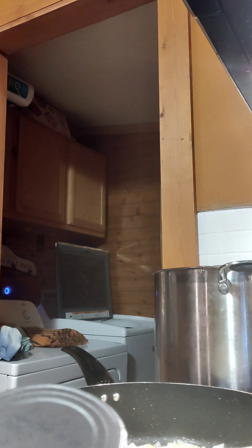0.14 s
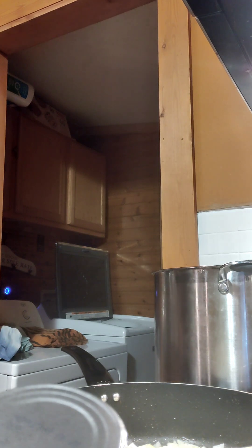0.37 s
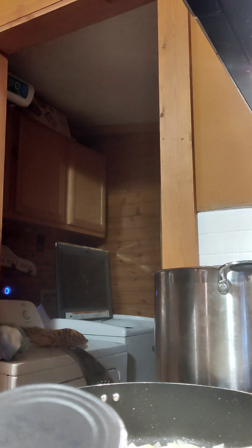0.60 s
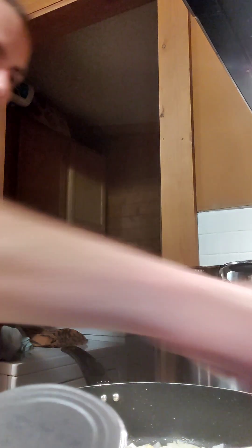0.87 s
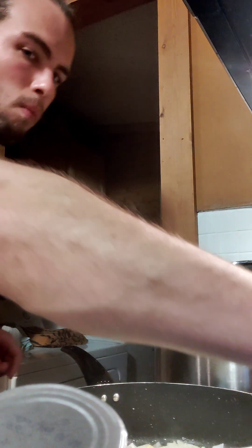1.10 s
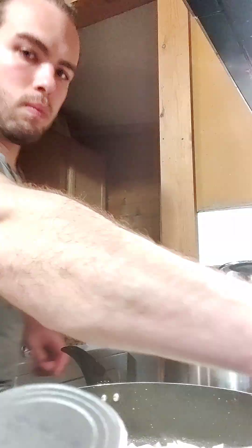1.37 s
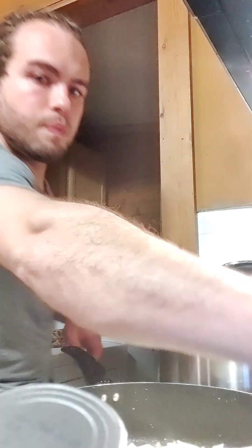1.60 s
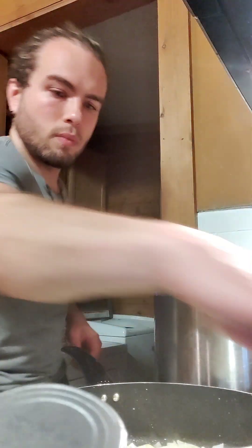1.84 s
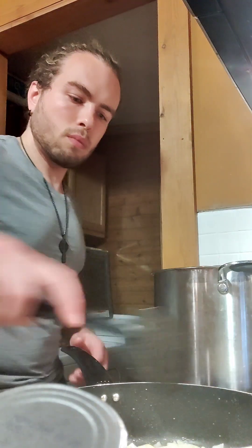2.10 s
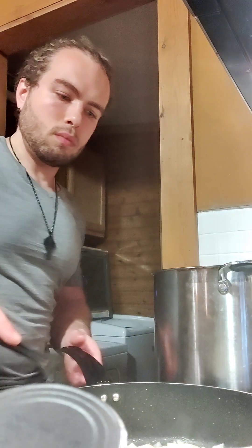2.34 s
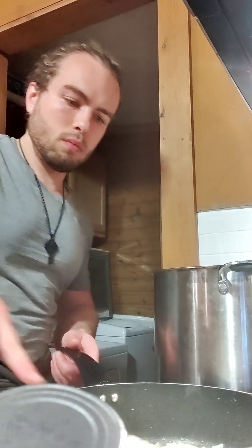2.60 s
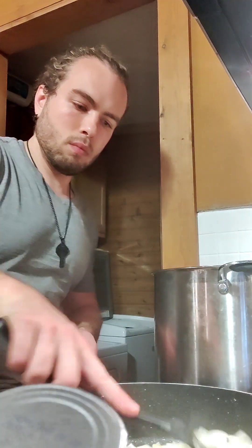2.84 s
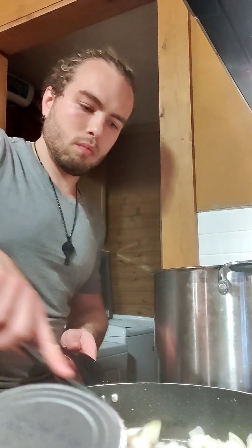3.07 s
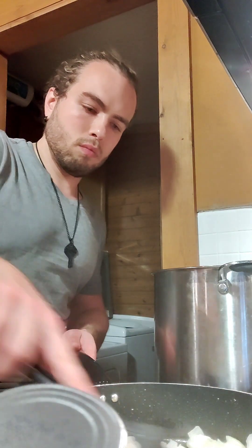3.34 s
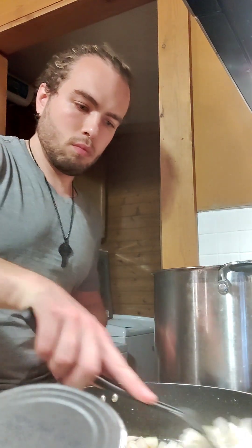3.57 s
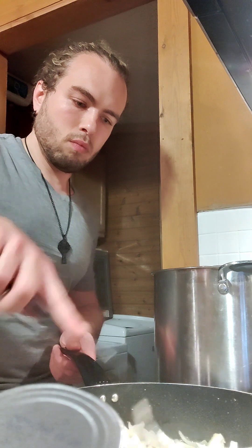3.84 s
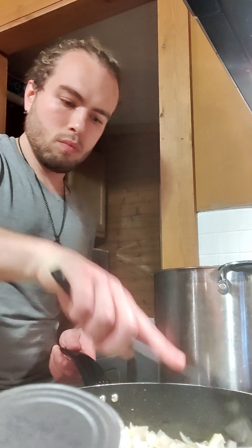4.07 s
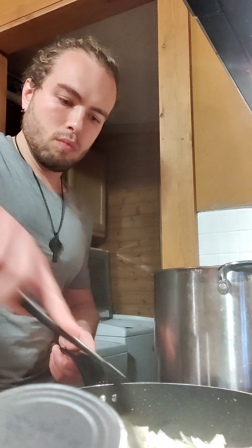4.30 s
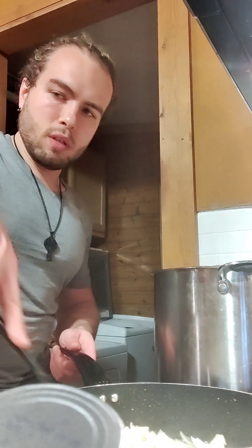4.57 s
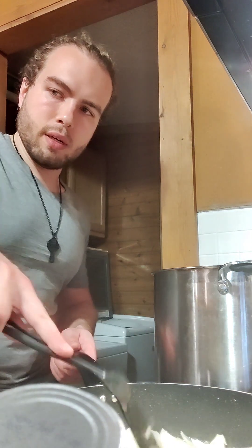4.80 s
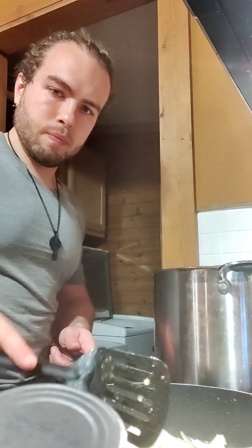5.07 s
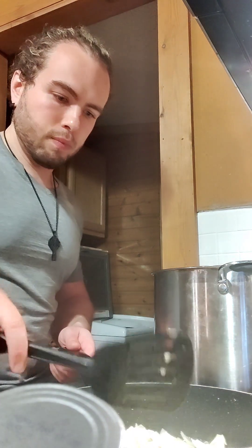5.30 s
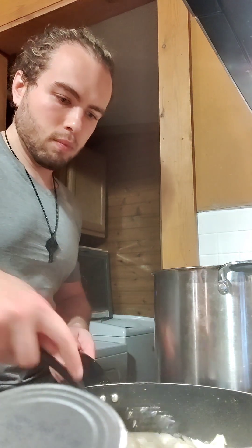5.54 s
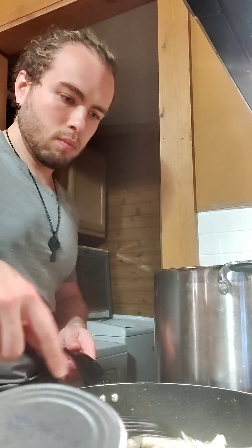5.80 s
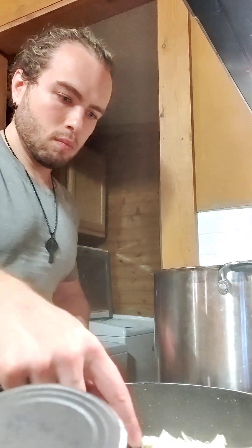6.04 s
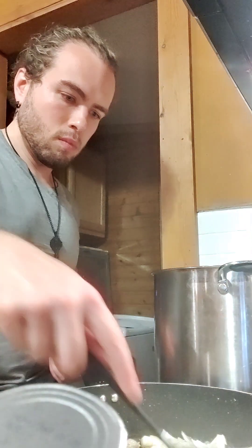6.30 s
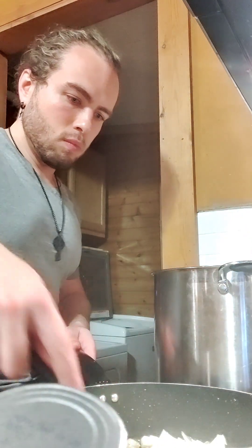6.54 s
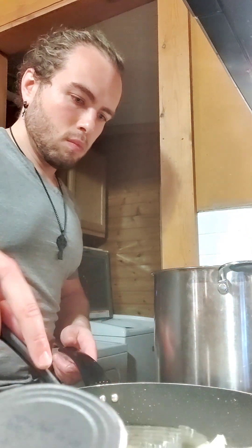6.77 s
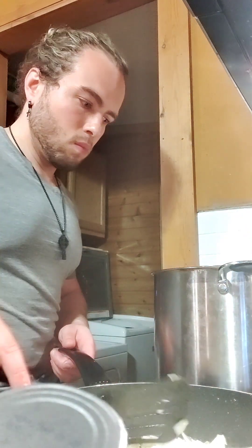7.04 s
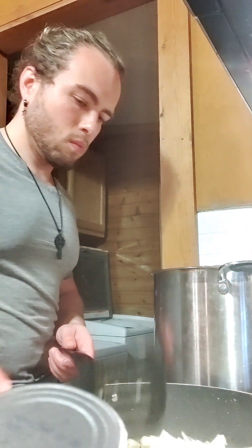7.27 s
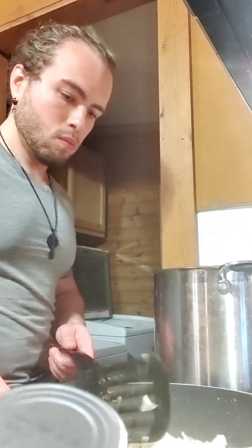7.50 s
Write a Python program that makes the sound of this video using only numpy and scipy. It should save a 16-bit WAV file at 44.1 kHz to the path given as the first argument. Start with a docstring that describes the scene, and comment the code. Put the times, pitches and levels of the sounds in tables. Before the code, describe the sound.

Chopped onions sizzle softly in a pan; a spatula clatters as it is picked up, stirs quietly, then knocks the rim three times loudly.

```python
"""Chopped onions fry gently in a pan close to a mono microphone in a small kitchen.
The frying is dense random bubble clicks, coloured and levelled in bands; bursts and spits of fat stand out.
A spatula is picked up with a clatter of damped tones, touches the pan while stirring and drags over its
floor, then is knocked out on the rim three times: each blow rings a bank of pan modes.
The pan's low resonances simmer as filtered noise, and an appliance hums behind as wavering sines."""
import sys
import numpy as np
from scipy import signal
from scipy.fft import rfft, irfft
from scipy.io import wavfile

SR = 44100
rng = np.random.default_rng(int(sys.argv[2]) if len(sys.argv) > 2 else 0)


def magnitude_from_level(level_db):
    """Linear magnitude for a level in decibels (20 dB per decade)."""
    exponent = np.asarray(level_db, float) / 20
    return 10 ** exponent


def materialize(psi):
    """Save the field psi as 16-bit PCM at rate SR to the path in sys.argv[1].

    A 1-D psi becomes a single channel; in a 2-D psi each row is a channel.
    """
    bounded = np.clip(np.atleast_2d(psi).T, -1, 1)
    quanta = np.round(bounded * 32767).astype(np.int16)
    wavfile.write(sys.argv[1], SR, quanta)


N = 337082
TIME = np.arange(N) / SR
CALM_FIZZ_DB = -52.5   # fizz at rest, before its surges and flicker


def rms_one(x):
    """Scale to rms 1."""
    return x / np.sqrt(np.mean(x ** 2) + 1e-20)


def filtered(x, order, hz, kind):
    """Butterworth filter: low, high or band."""
    return signal.sosfilt(signal.butter(order, hz, kind, fs=SR, output="sos"), x)


def drift(rate_hz):
    """Slow chance of spread 1: coarse noise, one value per 40 samples, twice through a one-pole low-pass."""
    r = np.exp(-2 * np.pi * rate_hz * 40 / SR)
    noise = rng.standard_normal(N // 40 + 2002)
    slow = signal.lfilter([1], [1, -2 * r, r * r], noise)[2000:]   # leave out the run-in
    return np.interp(np.arange(N) / 40, np.arange(len(slow)), rms_one(slow))


def ring(clicks, hz, t60):
    """A resonator: a unit click sets a damped sine of height about 1 ringing."""
    r, w = magnitude_from_level(-60 / (t60 * SR)), 2 * np.pi * hz / SR
    return signal.lfilter([0, np.sin(w)], [1, -2 * r * np.cos(w), r * r], clicks + 1e-18)


def resonance(noise, hz, width_hz):
    """A damped resonance kept going by noise, its decay time set by its width, rms 1."""
    return rms_one(ring(noise, hz, np.log(1000) / (np.pi * width_hz)))


def add(out, s, sound):
    """Mix a short sound in at s seconds."""
    i = round(s * SR)
    out[i:i + len(sound)] += sound[:max(N - i, 0)]


def grains(per_s, spread_db):
    """Random clicks, most small and a few large, rms 1."""
    sizes = magnitude_from_level(spread_db * np.minimum(rng.exponential(1, N), 5)) * rng.choice([-1, 1], N)
    return rms_one(sizes * (rng.random(N) < per_s / SR))


def liveliness():
    """Lift of the frying in dB: each stir or jolt turns fresh onion into the fat; quick rise, then fading."""
    # stirs and jolts of the pan: (t/s, lift/dB, fade/s)
    stirs = [(-.05, 7.5, 0.095), (.30, 5, 0.21), (1.39, 5.5, 0.52), (2.55, 5, 0.96), (3.08, 4.5, 0.17),
             (3.49, 4.5, 0.42), (3.72, 4.5, 0.39), (4.071, 1, 0.68), (4.28, 1, 0.96), (4.782, 5, 0.37),
             (5.699, 2.5, 0.077), (6.21, 1, 0.17), (6.51, 7.5, 0.12), (6.78, 7, 0.042), (7.33, 6, 0.41),
             (7.48, 5, 0.25)]
    attack_s = 0.027
    coarse = TIME[::64]
    lift_db = np.zeros(len(coarse))
    for s, db, fade in stirs:
        t = np.maximum(coarse - s, 0)
        lift_db += db * (1 - np.exp(-t / attack_s)) * np.exp(-t / fade)
    return np.interp(TIME, coarse, lift_db)


def sizzle(per_s, spread_db, smooth, surge_db, neighbour_db, own_db):
    """Dense bubble collapses heard in third-octave bands; they come in surges, and the bands flicker."""
    # colour of fizz and murmur: (f/Hz, relative density/dB per Hz)
    fizz_colour = [(190, -45), (330, 0), (371, 5), (482, -4.5), (542, 4.5), (594, -1), (803, 3.5),
                   (903, 1.5), (1020, 6), (1300, 0), (1600, 6), (2440, 3.5), (3510, 4.5), (6500, 6.5),
                   (7500, 5), (9750, -31), (16500, -120)]
    # colour of the top treble of the sizzle: (f/Hz, relative density/dB per Hz)
    treble_colour = [(7900, -4.5), (8300, -1), (9500, -1), (11000, -6.5), (12500, -9.5), (14000, -10.5),
                     (15100, 2.5), (15600, -14)]
    lift_db = liveliness()
    fizz_db = CALM_FIZZ_DB + lift_db
    murmur_db = -53 + 0.7 * lift_db
    treble_db = -50 + 0.67 * lift_db + 0.5 * TIME   # the top treble rises slowly throughout
    surge = surge_db * (drift(12) + drift(40))
    regions = [neighbour_db * drift(25) for _ in range(4)]   # neighbouring bands flicker together

    # clicks over smooth noise, twice, so that adjacent bands differ
    crackle = [grains(per_s, spread_db) + smooth * rng.standard_normal(N) for _ in range(2)]
    colour_hz, colour_db = np.transpose(fizz_colour[:-2] + treble_colour)
    hz = np.fft.rfftfreq(N, 1 / SR) + 1
    colour = magnitude_from_level(np.interp(np.log(hz), np.log(colour_hz), colour_db))
    in_fizz = (hz > 4500) * (hz < 7800)   # this range sets the reference level
    fizz_share = np.sqrt(np.mean(colour ** 2 * in_fizz) * (1 + smooth ** 2))
    crackle = irfft(rfft(np.array(crackle)) * colour / fizz_share, N)

    edges = 250 * 2 ** (np.arange(20) / 3)
    out = np.zeros(N)
    for k, (low, high) in enumerate(zip(edges, edges[1:])):
        band = filtered(crackle[k % 2], 2, [low, high], "band")
        level_db = murmur_db if high < 2600 else treble_db if low > 7900 else fizz_db
        level_db = level_db + surge + regions[k // 5]
        if low < 11000:
            level_db = level_db + own_db * drift(21)   # each band's own flicker
        out += band * magnitude_from_level(level_db)
    return out


def simmer():
    """Low pan and stove resonances kept going by the simmer: noise twice through each, wavering."""
    # resonances: (f/Hz, width of each pass/Hz, rms level/dB)
    low_modes = [(145.2, 20, -64), (215.8, 25.6, -57.5), (293.6, 89, -67), (76, 80, -76.5)]
    lift_db = liveliness()
    follow_db = 0.4 * (lift_db - lift_db.mean())
    out = np.zeros(N)
    for hz, width_hz, level_db in low_modes:
        once = resonance(rng.standard_normal(N), hz, width_hz)
        twice = resonance(once, hz, width_hz)
        out += magnitude_from_level(level_db + follow_db + 0.23 * drift(5.2)) * twice
    return out


def hum():
    """Appliance motor tones: sines that waver slowly in level and phase."""
    # tones: (f/Hz, rms level/dB)
    tones = [(75.4, -70), (142, -74), (204.6, -72.5), (301.5, -69.5), (376.8, -79.5)]
    out = np.zeros(N)
    for hz, level_db in tones:
        height = np.sqrt(2) * magnitude_from_level(level_db + 1.0 * drift(0.56))
        out += height * np.sin(2 * np.pi * hz * TIME + 0.2 * drift(0.52))
    return out


def spits():
    """Short broad bursts of spitting fat, at random, following the fizz."""
    per_s, level_db, t60_s = 70, 2, 0.031   # level of the smallest, relative to the fizz
    sizes = (rng.random(N) < per_s / SR) * magnitude_from_level(1.3 * np.minimum(rng.exponential(1, N), 3))
    fall = signal.lfilter([1], [1, -magnitude_from_level(-60 / (t60_s * SR))], sizes + 1e-18)
    hiss = filtered(rng.standard_normal(N), 4, [1500, 8000], "band")
    return magnitude_from_level(CALM_FIZZ_DB + liveliness() + level_db) * fall * hiss


def bubble(hz, cycles, rise, swell):
    """A bursting bubble: a sine swells for a few cycles and climbs in pitch as it dies; its envelope too."""
    t = np.arange(int(2 + cycles / hz * SR)) / SR * hz   # time in cycles
    fall = magnitude_from_level(-60 * t / cycles) * (1 - np.exp(-t / swell))
    fall = fall / fall.max()
    return np.sin(2 * np.pi * t * (1 + rise * t / cycles)) * fall, fall


def pops(small_per_s, small_db, small_cycles):
    """Large bursts ring, sputter and splash fat; many smaller ones come at random and follow the fizz."""
    # single large bubbles bursting: (t/s, ring level/dB, f/Hz, broad splash re ring/dB)
    bursts = [(0.0732, -52, 3600, 5), (0.104, -48, 6200, 5.5), (0.7087, -48.5, 6570, 3),
              (0.905, -41, 4900, -10), (0.9836, -49, 5470, 2.5), (2.34, -43, 8900, -10),
              (2.684, -51, 6700, -6), (2.91, -40.5, 3240, -6), (3.309, -36, 6570, -7),
              (3.4015, -36, 6030, -14), (3.4857, -32, 5500, -12), (3.625, -33, 4330, -9),
              (3.659, -37, 5420, -12), (3.673, -36.5, 6200, -13), (3.718, -33.5, 4090, -10),
              (3.793, -48, 6050, -7), (3.86, -40, 4800, -6), (3.988, -33, 6660, -11.5),
              (4.042, -53, 6900, -4), (4.315, -41, 5550, -11), (4.344, -43, 4960, -4),
              (4.4667, -38.5, 5220, -12), (4.6353, -32, 4770, -15), (5.1452, -39, 6520, -20),
              (5.3012, -41.5, 7350, -8), (5.5947, -63.5, 6100, -10), (5.805, -46, 3930, -10),
              (5.976, -52, 5740, -10), (6.012, -56, 6240, 8), (6.0302, -38.5, 5880, -14),
              (6.062, -43, 6030, -12), (6.208, -48, 4050, -9), (6.578, -40, 5800, -22),
              (7.062, -45, 4920, 1.5)]
    out = np.zeros(N)
    for s, peak_db, hz, splash_db in bursts:
        noise = rng.standard_normal(6000)
        tone, fall = bubble(hz, cycles=120, rise=0.029, swell=19.0)
        sputter = rms_one(filtered(noise[::-1], 2, 302, "low"))[-len(fall):]
        tone = tone * (0.5 + sputter)
        splash = fall * rms_one(filtered(noise, 2, [2500, 8000], "band"))[:len(fall)]
        add(out, s - .001, magnitude_from_level(peak_db) * (tone + magnitude_from_level(splash_db) * splash))
    fizz_db = CALM_FIZZ_DB + liveliness()
    for when, pitch, size, keep in rng.random((2500, 4)):
        if keep < small_per_s * N / SR / 2500:   # thin the candidates to the wanted rate
            level_db = fizz_db[int(when * N)] + small_db - 5.3 * np.log(size + 0.02)
            tone, _ = bubble(3200 * 2.5 ** pitch, small_cycles, rise=.1, swell=3.0)
            add(out, when * N / SR, magnitude_from_level(level_db) * tone)
    return out


def clatter():
    """Each contact rings a close, beating pair of modes over a short broad rattle."""
    # clicks of the spatula and of things beside the stove: (t/s, level/dB, f/Hz, t60/s, rattle re ring/dB)
    contacts = [(.281, -24.5, 3450, 0.014, -27), (.290, -49, 3620, 0.045, -14),
                (.293, -24, 2053, 0.086, -8.5), (0.296, -29.5, 6230, 0.048, -8),
                (.2975, -19.5, 2323, 0.07, -19), (0.3017, -6.5, 2270, 0.014, -13),
                (0.3085, -21, 2310, .03, -18), (.3155, -27.5, 2313, 0.086, -11.5),
                (.341, -49, 4550, 0.025, -2), (0.474, -37, 2780, 0.086, -4.5), (1.078, -50.5, 1600, 0.1, 5),
                (.805, -43, 2900, .03, 0), (.906, -42, 1600, 0.029, 0.5), (1.125, -39, 2900, 0.042, -0.5),
                (1.180, -47.5, 4340, 0.047, 7), (1.358, -31.5, 980, 0.073, -10.5),
                (1.3923, -30, 2300, 0.022, 2), (1.3959, -20, 1094, 0.021, -1.5),
                (1.399, -29, 3370, 0.027, -3), (1.408, -24.5, 980, 0.088, -11),
                (1.404, -26, 1970, 0.03, -2), (1.418, -26, 2120, 0.045, -12),
                (1.4185, -16.5, 700, 0.027, -6.5), (1.423, -27.5, 3250, 0.058, -22),
                (1.427, -23, 760, 0.022, -6), (1.444, -27, 1450, 0.042, -8), (1.451, -21, 980, 0.025, -8),
                (1.465, -30, 1470, 0.029, -14), (1.478, -33, 3400, 0.047, -2),
                (1.708, -30.5, 1600, 0.024, -8.5), (1.766, -42, 977, 0.058, -1),
                (1.778, -31, 4260, 0.046, -3), (1.822, -29.5, 4310, 0.031, -4.5),
                (3.498, -32, 2210, 0.063, -6)]
    out, t = np.zeros(N), TIME[:8000]
    for s, peak_db, hz, t60, rattle_db in contacts:
        top_hz = 2870 * (hz / 1000) ** 0.42   # smaller things rattle higher
        fall = magnitude_from_level(-60 * t / t60) * (1 - np.exp(-t / 0.0017))
        pair = .56 * np.sin(2 * np.pi * hz * t) + .44 * np.sin(2 * np.pi * hz * 1.06 * t)
        rattle = rms_one(filtered(rng.standard_normal(8000), 4, [top_hz / 5.7, top_hz], "band"))
        add(out, s - .001, magnitude_from_level(peak_db) * fall * (pair + magnitude_from_level(rattle_db) * rattle))
    return out


def knocks(ring_db, chatter_db, chatter_t60):
    """A blow and its rebounds strike all pan modes; the blade chatters on, which roughens the ring."""
    # spatula on the pan: (t/s, level/dB, deepest mode/dB, rim modes/dB, contact low-pass f/Hz)
    hits = [(1.399, -27, 8, 2, 2640), (2.554, -26.5, 15.5, -10, 710), (3.05, -43, 1, 2, 3000),
            (3.493, -36.5, 1, 7, 5030), (3.721, -32.5, -5, -4, 1600), (4.801, -34, -13, 13, 820),
            (5.732, -45.5, 6, 2, 3020), (6.507, -29, -14, 6, 2400), (6.878, -44, -11, 10, 2000),
            (7.3286, -9, 6, 2, 9000), (7.4809, -3.5, 5.5, -4.5, 9000), (7.6256, -2.5, 1, -9, 8000)]
    # modes of the pan: (f/Hz, relative level/dB, t60/s)
    pan_modes = [(144, -10, 0.09), (214, 0, 0.07), (350, -7, 0.05), (570, -14, 0.046), (650, -10, 0.04),
                 (765, 0, 0.03), (898, -11, 0.09), (987, -7, 0.063), (1143, 1, 0.045), (1283, -15, 0.073),
                 (1405, -13, 0.047), (1470, -17, 0.08), (1740, -31, 0.043), (2160, -6, 0.045),
                 (2260, -10, 0.035), (2770, -18, 0.034), (3340, -36, 0.024), (3590, -15, 0.093),
                 (3480, -9, 0.04), (4140, -13, 0.04), (4770, -6, .03), (5130, -11, 0.04), (4880, -14, 0.05),
                 (5400, -16, 0.033), (5600, -8, 0.02), (5980, -5.5, 0.013), (7160, -10, 0.024),
                 (7750, -15, 0.028)]
    # modes rung freely only by a glancing blow: (f/Hz, relative level/dB, t60/s)
    rim_modes = [(537, -5.5, 0.079), (1925, -5.5, 0.069), (2350, -4, 0.055), (4640, 0, 0.035)]
    # dense clack of blade and food between the modes: (low f/Hz, high f/Hz, relative level/dB, t60/s)
    clack_bands = [(246, 404, -25, 0.08), (490, 810, -22, 0.061), (724, 1350, -14, 0.06),
                   (1250, 2100, -16.5, 0.048), (2000, 4000, -17.5, 0.036), (2670, 6600, -16.5, 0.046),
                   (5600, 21000, -17.5, 0.031), (8000, 21000, -44, 0.034)]
    # the spatula rebounds: (delay/s, relative level/dB, tilt above 250 Hz/dB per octave)
    rebounds = [(0, -9.5, 2.5), (.0026, 4, 2), (.0085, -9, -1.5), (0.018, -5, 0.5), (0.034, -2.5, -34)]
    out, t = np.zeros(N), TIME[:9000]
    for s, peak_db, deep_db, rim_db, soft_hz in hits:
        chatter_noise, clack_noise = rng.standard_normal((2, 9000))
        chatter = filtered(chatter_noise, 2, 600, "high")   # little bass
        contact = magnitude_from_level(chatter_db - 60 * t / chatter_t60) * chatter
        contact[0] = 1   # the blow itself
        modes = [(hz, db + (deep_db if k == 0 else 0), t60) for k, (hz, db, t60) in enumerate(pan_modes)]
        modes += [(hz, db + rim_db, t60) for hz, db, t60 in rim_modes]
        parts = [(hz, ring(contact, hz, t60) * magnitude_from_level(db + ring_db)) for hz, db, t60 in modes]
        for low, high, db, t60 in clack_bands:
            band = rms_one(filtered(clack_noise, 2, [low, high], "band"))
            parts.append((np.sqrt(low * high), band * magnitude_from_level(db - 60 * t / t60)))

        blow = np.zeros(12000)
        for hz, part in parts:
            octaves = np.log2(hz / 1000)
            for delay, bounce_db, tilt_db in rebounds:
                scatter_db = 1.5 * rng.standard_normal()   # each strikes the modes a little differently
                level_db = peak_db + scatter_db - 3.5 * octaves + bounce_db
                level_db += tilt_db * max(octaves + 2, 0)
                add(blow, delay, part * magnitude_from_level(level_db))
        add(out, s, filtered(blow, 2, soft_hz, "low"))   # the plastic blade is soft
    return out


def scrapes():
    """Dense slips of the blade dragged over the pan floor excite a few broad resonances."""
    # strokes of the blade: (t/s, length/s, level/dB)
    strokes = [(2.598, 0.28, -53.5), (2.973, 0.13, -54), (3.516, 0.31, -55), (4.791, 0.14, -50.5)]
    # resonances they excite: (f/Hz, width/Hz, relative level/dB)
    drag_modes = [(220, 83, -5.5), (980, 480, -7.5), (1600, 140, -6), (2170, 160, -6), (3450, 290, -3)]
    attack_s, swell_db, release_db_per_s = 0.023, -1.5, 92   # it eases slightly along the stroke
    level = np.zeros(N)
    for s, length, db in strokes:
        t = TIME - s
        shape_db = swell_db * (np.clip(t / length, 0, 1) - .5)
        shape_db -= release_db_per_s * np.maximum(t - length, 0)
        level += np.clip(t / attack_s, 0, 1) * magnitude_from_level(db + shape_db)
    slips = grains(2500, spread_db=1.0)
    return level * sum(magnitude_from_level(db) * resonance(slips, hz, width_hz) for hz, width_hz, db in drag_modes)


def kitchen(x):
    """Dense dull reflections that die away, starting after the nearest wall."""
    t60_s, level_db, wall_cut_hz, low_cut_hz = .16, -16, 2000, 350
    t = TIME[:SR // 2]
    dull = np.exp(-2 * np.pi * wall_cut_hz / SR)
    tail = signal.lfilter([1], [1, -dull], rng.standard_normal(len(t)))
    tail = tail * magnitude_from_level(-60 * t / t60_s) * (t > .003)
    tail = filtered(tail, 2, low_cut_hz, "high")
    return magnitude_from_level(level_db) * signal.fftconvolve(x, tail / np.sqrt(np.sum(tail ** 2)))[:N]


def scene():
    """Blows and pops sound in the room; steady frying and hum lie under them; one microphone, two channels."""
    blows = pops(small_per_s=100, small_db=-9.5, small_cycles=25) + spits() + clatter() + scrapes()
    blows = blows + knocks(ring_db=-20.0, chatter_db=-23.5, chatter_t60=0.056)
    blows = filtered(blows + kitchen(blows), 6, 125.4, "high")
    fry = sizzle(per_s=9000, spread_db=3.2, smooth=.9, surge_db=.75, neighbour_db=.9, own_db=.9)
    steady = filtered(fry + simmer() + hum(), 2, 47, "high")   # rumble cut
    mono = blows + steady
    return np.array([mono, mono])


def roll_off(x):
    """The treble ends steeply here."""
    return signal.sosfilt(signal.butter(12, 16840, fs=SR, output="sos"), x)


def record(dry):
    """Peaks are rounded off near full scale and the top is cut steeply."""
    rounded = 1.3 * np.tanh(dry / 1.3)
    top_cut = signal.cheby2(14, 60, 15700, fs=SR, output="sos")   # 60 dB down from 15.7 kHz
    return roll_off(signal.sosfilt(top_cut, rounded))


dry = scene()
out = record(dry)
materialize(out)
```